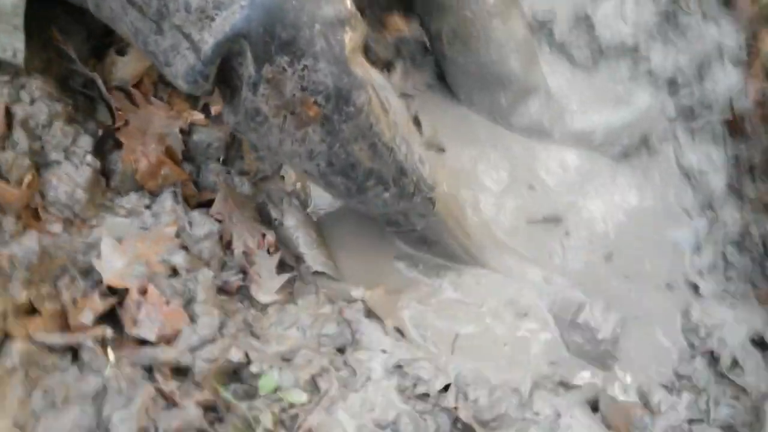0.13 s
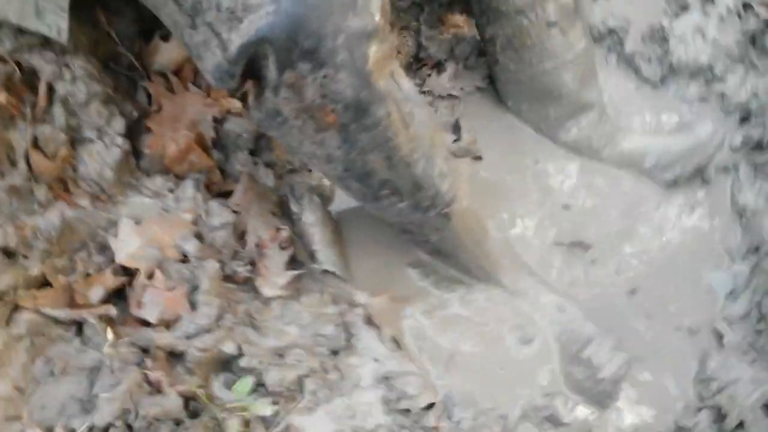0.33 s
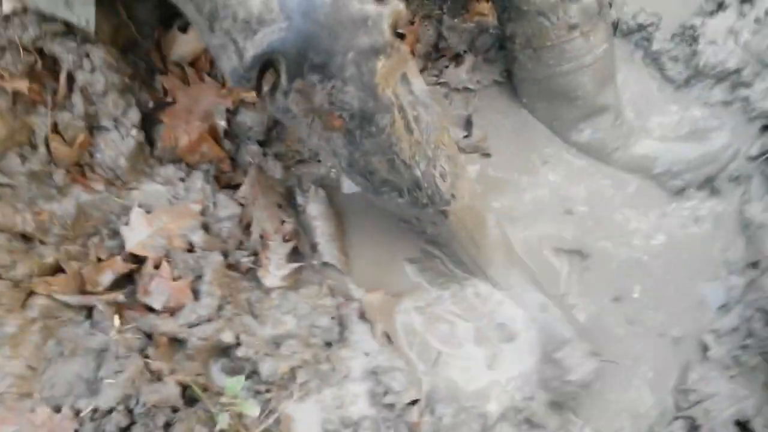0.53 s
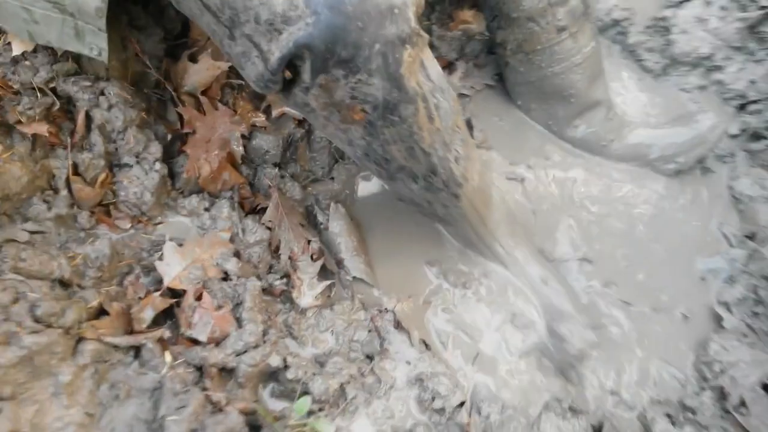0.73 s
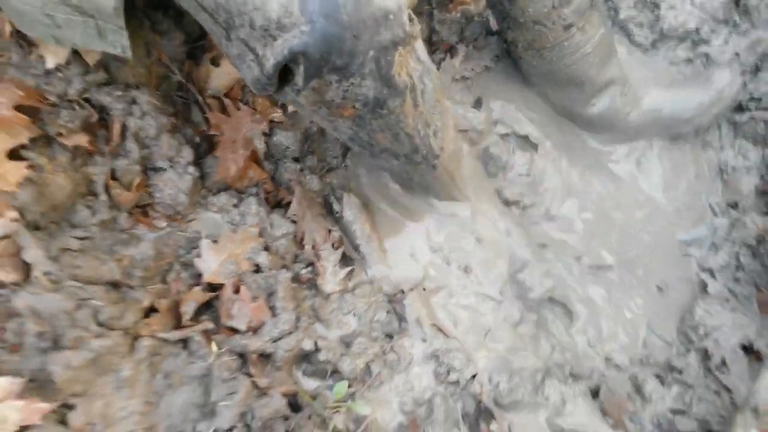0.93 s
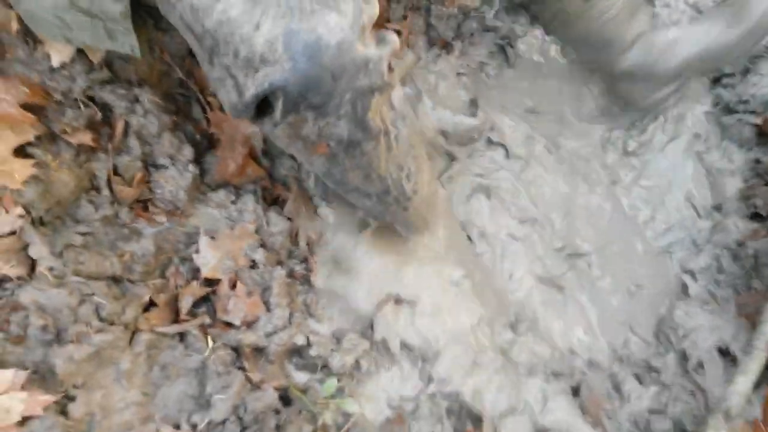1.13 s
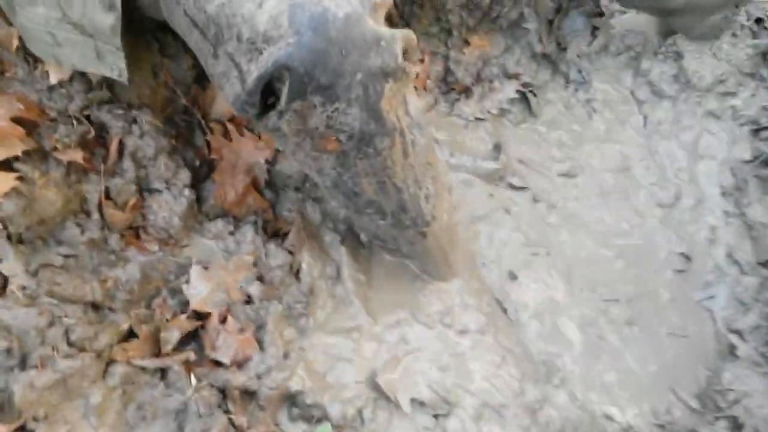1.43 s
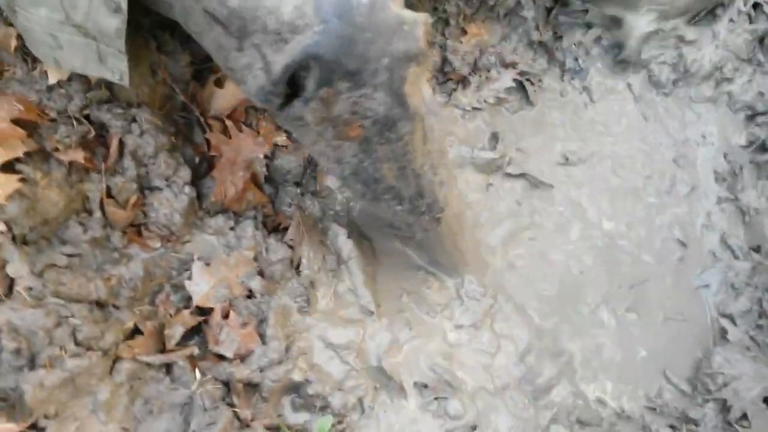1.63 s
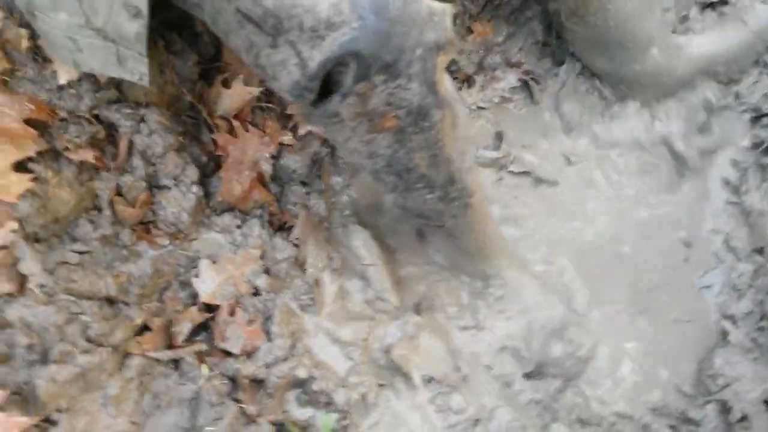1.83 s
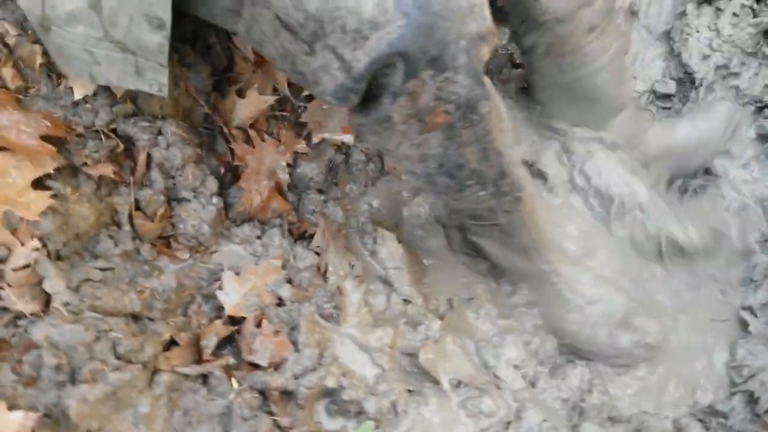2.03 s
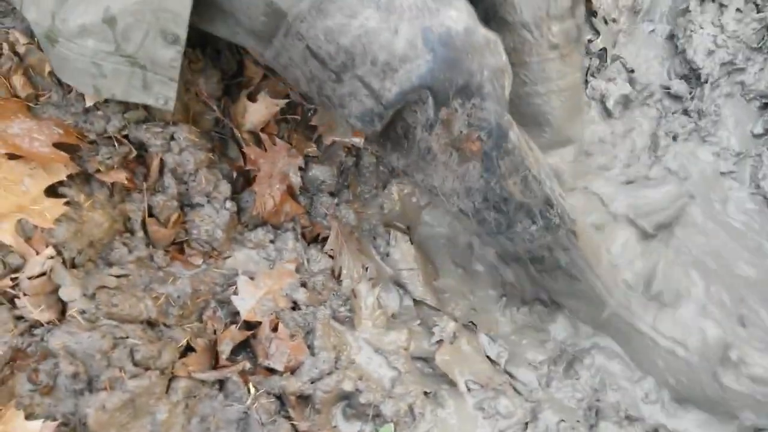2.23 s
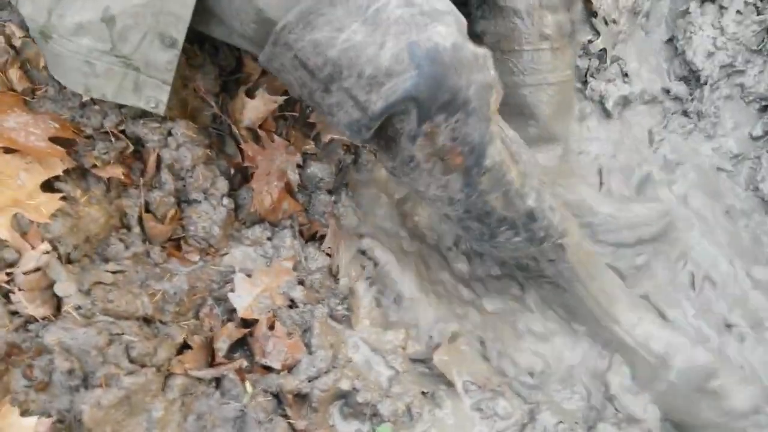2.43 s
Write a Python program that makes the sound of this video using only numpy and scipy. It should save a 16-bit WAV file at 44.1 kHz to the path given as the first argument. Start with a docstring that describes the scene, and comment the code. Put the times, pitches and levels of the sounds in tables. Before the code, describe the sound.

Boots churn wet mud with gurgles, pops and spatter, following brief handling knocks and rubbing

```python
"""Boots churn a muddy puddle close to a hand-held camera, after its housing is bumped and rubbed.
The puddle is shaped noise grains for slosh and spray, gliding sines for bubbles, noise bursts for snaps
of mud film and ticks of spray; one big plop stands out. Bumps ring damped housing modes, the hand thumps
in low sines, rubbing is filtered grains. Nearly all is on the right; the left holds only a faint hiss."""
import sys
import numpy as np
from scipy import signal
from scipy.fft import rfft, irfft
from scipy.io import wavfile

SR = 44100
rng = np.random.default_rng(int(sys.argv[2]) if len(sys.argv) > 2 else 0)


def wav_out(sig):
    """Save sig, one row per channel (or a flat mono array), as 16-bit PCM at SR to the path in sys.argv[1]."""
    wavfile.write(sys.argv[1], SR, np.round(np.clip(np.atleast_2d(sig).T, -1, 1) * 32767).astype(np.int16))


N = 114660
T = np.arange(N) / SR


def amp(db):
    """Decibels to gain."""
    return 10 ** (np.asarray(db) / 20)


def evened(x):
    """Scales to rms 1."""
    return x / np.sqrt(np.mean(x ** 2) + 1e-20)


def noise():
    """White noise as long as the scene."""
    return rng.standard_normal(N)


def add(mix, start_s, sound):
    """Mixes a sound in at start_s, cut off at the end of the mix."""
    part = mix[max(round(start_s * SR), 0):][:len(sound)]
    part += sound[:len(part)]


def level(rows, axis=1):
    """Gain along a dB curve, fading out exponentially beyond its ends."""
    rows = np.array(rows)
    outside_s = np.maximum(rows[0, 0] - T, 0) + np.maximum(T - rows[-1, 0], 0)
    return amp(np.interp(T, rows[:, 0], rows[:, axis])) * np.exp(-outside_s / 0.0059)


def colour(x, points):
    """Causal minimum-phase filter of unit energy with the given spectrum."""
    hz, db = np.transpose(points)
    size = 8192
    f = np.fft.rfftfreq(size, 1 / SR)
    curve_db = np.interp(np.log(f + 1), np.log(np.sort(hz)), db)
    # folding the cepstrum puts the filter's energy first
    cepstrum = irfft(np.log(amp(curve_db)))
    cepstrum[1:size // 2] *= 2
    cepstrum[size // 2 + 1:] = 0
    taps = irfft(np.exp(rfft(cepstrum)))[:size // 2]
    return signal.fftconvolve(x, taps / np.linalg.norm(taps))[:N]


def grains(per_s, spread_db, clump_db=3, clump_s=0.0054):
    """Random clicks of uneven size that come in clumps, at rms 1."""
    sizes = amp(spread_db * np.minimum(rng.exponential(1, N), 4)) * rng.choice([-1, 1], N)
    clumps = np.interp(T / clump_s, np.arange(N), np.clip(rng.standard_normal(N), -2, 2))
    hits = rng.random(N) < per_s / SR
    return evened(sizes * hits * amp(clump_db * clumps))


def bursts(rows, rise_s):
    """Envelope of quick bursts, from rows (time [s], level [dB], decay [s])."""
    out, t = np.zeros(N), T[:SR // 4]
    for start_s, db, decay_s in rows:
        add(out, start_s, amp(db) * (1 - np.exp(-t / rise_s)) * np.exp(-t / decay_s))
    return out


# Spectrum of the right-hand noise bed: (frequency [Hz], relative level [dB])
AIR_SPECTRUM = [(20, 0.5), (120, 2.5), (500, 0), (2000, -14), (5000, -14), (15000, -22.5)]


def air():
    """Steady noise under the right side, strongest in the lows and mids."""
    return amp(-48.5) * colour(noise(), AIR_SPECTRUM)


# Spectrum of the left-hand hiss: (frequency [Hz], relative level [dB])
IDLE_SPECTRUM = [(45, -1.5), (130, 1), (1500, -18.5), (14500, -28)]


def idle_hiss():
    """Faint steady hiss, weighted to the lows."""
    return amp(-56.5) * colour(noise(), IDLE_SPECTRUM)


# Hiss that goes with the rubbing: (time [s], level [dB])
HISS_LEVEL = [(.06, -51), (.24, -38), (.34, -39), (.42, -52), (.56, -49.5), (.68, -62), (.9, -77)]
# Rubbing on the housing: (time [s], relative ring level [dB], relative rasp level [dB])
RUB_LEVELS = [(.14, -58, -43.5), (.2, -35.5, -38), (.24, -31.5, -44), (.335, -22.5, -30.5), (.40, -30, -33),
              (.48, -23, -31), (.575, -23.5, -34), (.605, -32, -39.5), (.675, -32, -42), (.92, -67, -64)]
# Light brushes on the housing: (time [s], half-width to 1/e [s], ring level [dB])
BRUSHES = [(1.041, 0.021, -39), (1.364, 0.067, -37)]
# Spectra of the rubbing's three parts: (frequency [Hz], relative level [dB])
HISS_SPECTRUM = [(3500, -2), (7000, 2), (11000, -9), (14500, -2.5)]
RING_SPECTRUM = [(25, -39), (130, -19), (290, -16), (335, -1), (355, 1.5), (395, -10), (465, -7.5),
                 (550, -18.5), (2000, -69.5)]
RASP_SPECTRUM = [(200, -34.5), (600, -1), (820, -4), (1100, -2), (1500, -4), (2000, -13.5), (2300, -20.5),
                 (3200, -15), (4300, -30.5), (15000, -50)]
RING_DB, RASP_DB, RUB_GRAIN_DB = 1, 0.5, 1.5  # trims, and spread of slip sizes


def rubbing():
    """Tiny slips on the housing give a hollow ring, a rasp and a hiss."""
    brushes = sum(amp(db) * np.exp(-((T - s) / width_s) ** 2) for s, width_s, db in BRUSHES)
    ring_level = amp(RING_DB) * level(RUB_LEVELS) + brushes
    ring = evened(colour(grains(4000, RUB_GRAIN_DB, clump_db=4.5), RING_SPECTRUM)) * ring_level
    slips = grains(4000, RUB_GRAIN_DB, clump_db=1.5) * level(RUB_LEVELS, axis=2)
    rasp = amp(RASP_DB) * colour(slips, RASP_SPECTRUM)
    hiss = colour(noise(), HISS_SPECTRUM) * level(HISS_LEVEL)
    return ring + rasp + hiss


# Soft thumps of the hand: (time [s], envelope peak [dB], pitch [Hz])
THUMPS = [(0.137, -28.5, 129), (0.529, -26.5, 144), (.562, -22, 273), (.579, -27.5, 202),
          (2.594, -26.5, 191)]
THUMP_PEAK_S = 0.0047  # time for a thump to reach its peak


def thumps():
    """Soft presses of the hand, too dull to ring the housing: a few low cycles each."""
    out, t = np.zeros(N), T[:SR // 4]
    for start_s, db, hz in THUMPS:
        press = t / THUMP_PEAK_S * np.exp(1 - t / THUMP_PEAK_S)
        add(out, start_s, amp(db) * press * np.sin(2 * np.pi * hz * t))
    return out


# Bumps on the housing: (time [s], relative level [dB], brightness corner [Hz], relative scuff level [dB])
KNOCKS = [(.139, -12, 193, -32.5), (0.153, -13, 390, -51), (0.157, -8.5, 2500, -19), (0.415, -4, 840, -38),
          (0.4269, -7, 410, -52), (.484, -17.5, 700, -33), (.578, -17, 284, -58)]
# What the housing rings with: (frequency [Hz], relative level [dB], time to fall 60 dB [s])
HOUSING_MODES = [(134, -22, 0.12), (244, -15, 0.044), (370.5, 4, 0.042), (476, -8, 0.054),
                 (1065, -4, 0.023), (1322, -17, 0.078), (1980, -18, 0.028), (3245, -7, 0.013)]
# Spectrum of the scuffs: (frequency [Hz], relative level [dB])
SCUFF_SPECTRUM = [(40, -19), (150, 13.5), (1200, 2.5), (3300, -3), (5000, -21), (15000, -59)]
KNOCK_DB, KNOCK_RISE_S = 6.5, 0.003
SCUFF_S, CRACK_DB, CRACK_S = 0.0095, 3, 0.00046  # scuff decay; trim and decay of its sharp onset


def knocks():
    """Bumps ring the housing; soft ones reach only its low modes, and each scuffs a little."""
    out, t = np.zeros(N), T[:SR // 4]
    for start_s, db, bright_hz, _ in KNOCKS:
        ring = np.zeros(len(t))
        for hz, mode_db, t60_s in HOUSING_MODES:
            mode_gain = amp(mode_db) / np.hypot(1, (hz / bright_hz) ** 2)
            ring += mode_gain * np.exp(-np.log(1000) * t / t60_s) * np.sin(2 * np.pi * hz * t)
        add(out, start_s, amp(db + KNOCK_DB) * ring * (1 - np.exp(-t / KNOCK_RISE_S)))
    scuffs = bursts([(s, db, SCUFF_S) for s, _, _, db in KNOCKS], 0.00037)
    cracks = bursts([(s, db + CRACK_DB, CRACK_S) for s, _, _, db in KNOCKS], CRACK_S / 10)
    return out + colour((scuffs + cracks) * noise(), SCUFF_SPECTRUM)


FLUTTER_DB, FLUTTER_S = 2, 0.0025  # depth, and time between gain changes


def flutter(t):
    """Uneven gain of thick mud that sticks and gives way every few milliseconds."""
    knots = np.clip(rng.standard_normal(size=128), -1, 1)
    return amp(FLUTTER_DB * np.interp(t / FLUTTER_S, np.arange(len(knots)), knots))


SWELL_S, SWELL_PER_OCTAVE = 0.0011, 0.013  # base swell; extra seconds per octave glided in one decay
WOBBLE, WOBBLE_S = 0.047, 0.0015  # pitch wobble as a share, and its time step


def bubble(hz, decay_s, glide):
    """A pocket of air swells into its note and dies, wobbling and gliding as it nears the surface."""
    swell_s = SWELL_S + SWELL_PER_OCTAVE * abs(glide) * decay_s
    t = np.arange(0, swell_s + 7 * decay_s, 1 / SR)
    knots = rng.standard_normal(size=128)
    wobble = np.exp(WOBBLE * np.interp(t / WOBBLE_S, np.arange(len(knots)), knots))
    # the glide rises one octave at most
    pitch = np.minimum(hz * wobble * 2 ** np.minimum(glide * t, 1), SR / 2)
    swell = np.sin(np.pi / 2 * np.minimum(t / swell_s, 1)) ** 2
    decay = np.exp(-np.maximum(t - swell_s, 0) / decay_s)
    return swell * decay * flutter(t) * np.sin(2 * np.pi * np.cumsum(pitch) / SR)


# Swarms of small bubbles: (middle pitch [Hz], spread [octaves], rate [per s], relative level [dB])
SWARMS = [(985, 0.443, 210, -1), (2890, 0.387, 340, 1.5), (7530, 0.362, 220, -2)]
# Stirring of the puddle: (time [s], relative slosh level [dB], relative spray level [dB])
STIR_LEVELS = [(.85, -66, -91), (1.15, -54.5, -56.5), (1.27, -48.5, -53.5), (1.38, -51.5, -56),
               (1.46, -60.5, -59.5), (1.54, -43.5, -46), (1.63, -46.5, -52), (1.78, -46.5, -46.5),
               (1.915, -51, -54.5), (1.97, -42, -51), (2.07, -47.5, -51), (2.13, -40, -53),
               (2.33, -39.5, -42.5), (2.375, -43, -46.5), (2.49, -43.5, -42.5), (2.6, -46, -52.5)]
SMALL_SPREAD_DB, SMALL_CYCLES = 3, 2.8  # size spread; typical decay in cycles at 1200 Hz
SMALL_GLIDE = 12  # spread of the glides [octaves per s]; their middle is half of it


def gurgle(count=700):
    """Swarms of small, quickly damped, gliding bubbles; the high ones follow the spray."""
    out = np.zeros(N)
    for hz, octaves, per_s, db in SWARMS:
        swarm = np.zeros(N)
        starts = STIR_LEVELS[0][0] + np.cumsum(rng.exponential(size=count)) / per_s
        draws = np.clip(rng.standard_normal(size=(count, 4)), -2, 2)
        for start_s, (pitch, size, ring, glide) in zip(starts, draws):
            note_hz = hz * 2 ** (octaves * pitch)
            decay_s = SMALL_CYCLES / np.sqrt(note_hz * 1200) * np.exp(0.5 * ring)
            note = bubble(note_hz, decay_s, SMALL_GLIDE * (0.5 + glide))
            add(swarm, start_s, amp(db + SMALL_SPREAD_DB * size) * note)
        out += swarm * level(STIR_LEVELS, axis=1 if hz < SWARMS[1][0] else 2)
    return out


# Spectra of slosh and spray: (frequency [Hz], relative level [dB])
SLOSH_SPECTRUM = [(25, -11), (120, -2), (1200, -2), (2000, -7.5), (3200, -5.5), (4800, -16.5), (15000, -18)]
SPRAY_SPECTRUM = [(1000, -15), (7000, 7), (10000, 0.5), (14500, -0.5)]
SLOSH_DB, GURGLE_DB, SPRAY_DB = 1.5, 10, 2.8
SLOSH_GRAIN_DB, SPRAY_GRAIN_DB, DROPS_PER_S = 2, 3, 3300


def puddle():
    """The boots stir thick water: slosh, gurgle and a fine crackle of spray."""
    slosh_grains = grains(2500, SLOSH_GRAIN_DB, clump_db=2.5) * level(STIR_LEVELS)
    slosh = colour(slosh_grains, SLOSH_SPECTRUM)
    drops = grains(DROPS_PER_S, SPRAY_GRAIN_DB, clump_db=2.5) * level(STIR_LEVELS, axis=2)
    spray = colour(drops, SPRAY_SPECTRUM)
    return amp(SLOSH_DB) * slosh + amp(GURGLE_DB) * gurgle() + amp(SPRAY_DB) * spray


# Base spectrum of a snap: (frequency [Hz], relative level [dB])
SNAP_SPECTRUM = [(60, -25), (300, -4.5), (1200, 6), (1800, -8), (3000, -1), (10000, -10.5), (15000, -6)]
POCKET_DB, POCKET_OCTAVES = 10.5, 0.17  # height and width of the pocket's resonance
SNAP_PATCH_DB, DULL_DB_PER_OCTAVE = 3.5, 3  # random unevenness; slope above the pocket's pitch


def snap(decay_s, pocket_hz, count=60):
    """A burst of tiny ruptures, coloured by the pocket behind the film and duller above its pitch."""
    t = T[:SR // 8]
    envelope = (1 - np.exp(-t / 0.0001)) * np.exp(-t / decay_s)
    burst = envelope * rng.standard_normal(len(t)) * flutter(t)
    hz, db = np.transpose(SNAP_SPECTRUM)
    f = np.linspace(hz[0], hz[-1], count)
    octaves_off = np.log2(f / pocket_hz)
    pocket = POCKET_DB * np.exp(-(octaves_off / POCKET_OCTAVES) ** 2 / 2)
    dull = DULL_DB_PER_OCTAVE * np.maximum(octaves_off, 0)
    patches = SNAP_PATCH_DB * rng.standard_normal(count)
    shape = np.interp(np.log(f), np.log(hz), db) + pocket - dull + patches
    return colour(burst, np.transpose([f, shape]))


# Mud films tearing and throwing spray: (time [s], level [dB], decay [s], pitch of the torn pocket [Hz])
SNAPS = [(.944, -37.5, 0.0022, 3200), (1.042, -37.5, 0.0043, 3170), (1.162, -26, 0.0067, 1570),
         (1.219, -25.5, 0.0027, 4330), (1.251, -29.5, 0.002, 3620), (1.263, -26, 0.0037, 2150),
         (1.501, -27, 0.0019, 6350), (1.516, -32, 0.016, 3980), (1.538, -29.5, 0.0036, 3480),
         (1.551, -30.5, 0.012, 2650), (1.667, -27.5, 0.0092, 6100), (1.681, -26.5, 0.0086, 2700),
         (1.731, -20, 0.0039, 3900), (1.754, -24, 0.0046, 4380), (1.868, -30.5, 0.0059, 3500),
         (1.912, -26.5, 0.002, 3200), (1.979, -30, 0.0033, 2580), (2.111, -30, .006, 3060),
         (2.127, -27.5, 0.011, 760), (2.21, -23, 0.0026, 2360), (2.238, -25.5, 0.0022, 4400),
         (2.266, -18.5, .002, 3050), (2.288, -19.5, 0.0037, 2800), (2.3047, -18.5, 0.008, 7650),
         (2.313, -16.5, 0.0064, 2630), (2.32, -17.5, 0.01, 695), (2.333, -21, 0.0096, 1070),
         (2.406, -25.5, 0.0058, 7000), (2.467, -22.5, 0.0028, 2300), (2.471, -31, 0.011, 6760),
         (2.518, -26, 0.0027, 3780)]


def snaps():
    """Mud films tear one by one, each with its own pocket."""
    out = np.zeros(N)
    for start_s, db, *film in SNAPS:
        add(out, start_s, amp(db) * snap(*film))
    return out


# Clear bubbles: (time [s], level [dB], pitch [Hz], decay [s], glide [octaves per s])
BUBBLES = [(1.105, -31, 790, 0.0018, 0), (1.161, -25, 590, 0.0092, -10), (1.162, -27.5, 2050, 0.0031, 9),
           (1.212, -24.5, 3100, 0.0017, 23), (1.222, -24, 1480, 0.004, -10), (1.397, -27, 800, 0.01, 30),
           (1.617, -21.5, 990, 0.0027, 21), (1.63, -16, 755, 0.0081, 6), (1.669, -22.5, 730, 0.007, 21.5),
           (1.677, -27.5, 1380, 0.002, 68), (1.722, -27, 934, 0.0057, 43),
           (1.756, -24.5, 1113, 0.019, -8.5), (1.934, -28.5, 940, 0.006, 12),
           (1.961, -29.5, 900, 0.0018, 95), (2.016, -31, 499, 0.023, -1), (2.031, -21, 1540, 0.00084, 6),
           (2.105, -25, 1190, 0.0027, 43), (2.135, -20.5, 1283, 0.0026, 26), (2.158, -26, 3450, 0.0091, 1),
           (2.18, -24, 3280, 0.0024, 8), (2.265, -20.5, 427, 0.003, -8), (2.289, -19, 686, 0.0038, 19),
           (2.305, -9.5, 614, 0.01, -3), (2.315, -19, 291, 0.0054, 0), (2.390, -19, 1250, 0.0017, 47),
           (2.437, -13.5, 3520, 0.0014, 72), (2.473, -19.5, 2400, 0.0031, 14),
           (2.503, -18, 2370, 0.0023, 22), (2.546, -25.5, 939, 0.0051, 66)]


def bubbles():
    """Single bubbles that pop or chirp, their air pockets ringing as gliding sines."""
    out = np.zeros(N)
    for start_s, db, *note in BUBBLES:
        add(out, start_s, amp(db) * bubble(*note))
    return out


# Bright ticks of fine spray: (time [s], level [dB], decay [s])
TICKS = [(1.128, -33, .0011), (1.283, -16, 0.0009), (2.438, -17, 0.0014)]
# Spectrum of a tick: (frequency [Hz], relative level [dB])
TICK_SPECTRUM = [(3000, -14), (7000, 3), (14500, 2)]


def ticks():
    """Fine spray ticks: very short bursts of bright noise."""
    return colour(bursts(TICKS, 0.0004) * noise(), TICK_SPECTRUM)


def surroundings(x, wet_db=-14, decay_s=0.026):
    """Adds faint, short reflections from boots and ground: sparse, decaying random echoes."""
    t = T[:SR // 8]
    echoes = rng.standard_normal(len(t)) * (rng.random(len(t)) < 0.05)
    taps = echoes * np.exp(-t / decay_s) * (t > 0.001)
    return x + amp(wet_db) * signal.fftconvolve(x, taps / np.linalg.norm(taps))[:N]


def scene():
    """The puddle and the handling on the right; a faint hiss on the left."""
    handling = knocks() + thumps() + rubbing()
    mud = surroundings(ticks() + bubbles() + snaps() + puddle())
    right = handling + mud + air()
    left = idle_hiss()
    return np.array([left, right])


def record(dry):
    """Limits the band with a steep low-pass at 14750 Hz."""
    low_pass = signal.firwin(401, 14750, window=("kaiser", 8), fs=SR)
    return signal.oaconvolve(dry, low_pass[None], "same")


dry = scene()
out = record(dry)
wav_out(out)
```